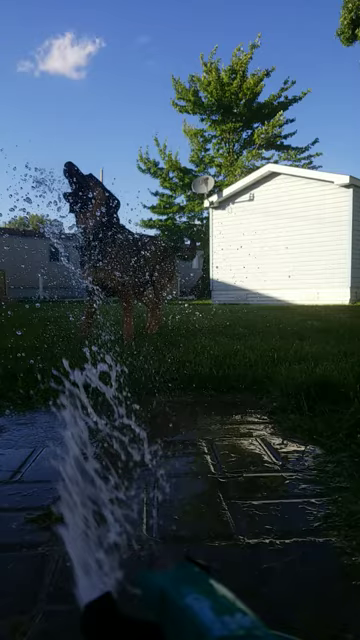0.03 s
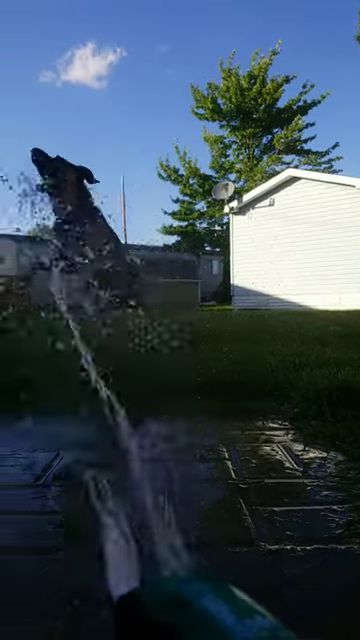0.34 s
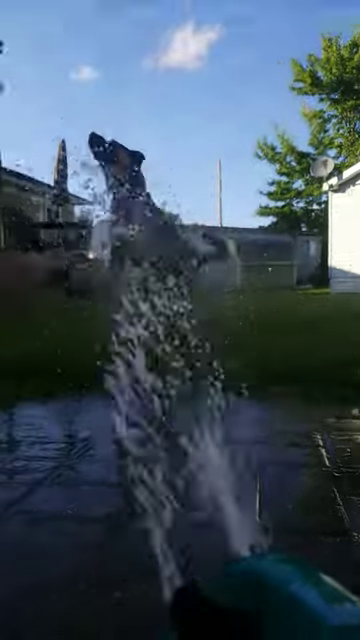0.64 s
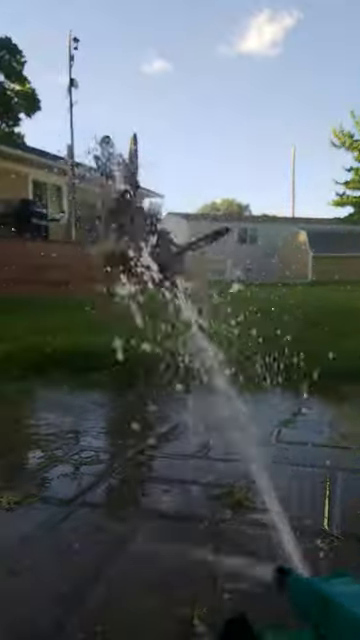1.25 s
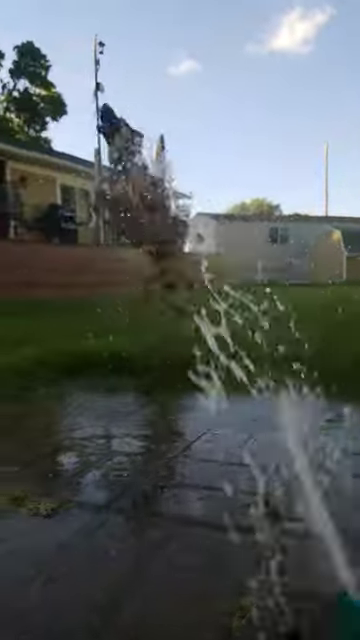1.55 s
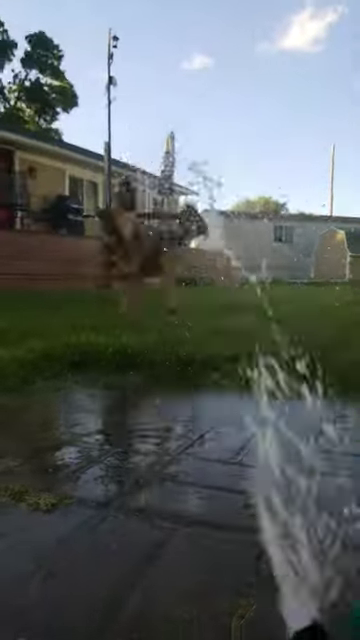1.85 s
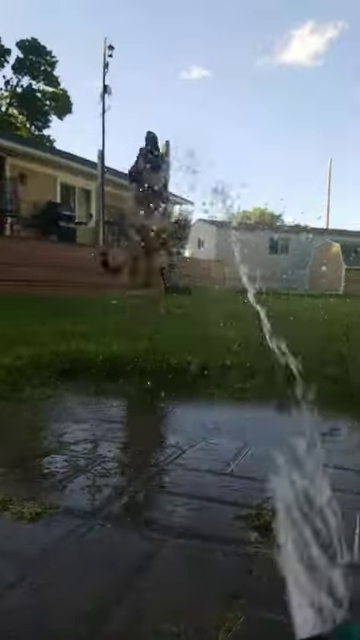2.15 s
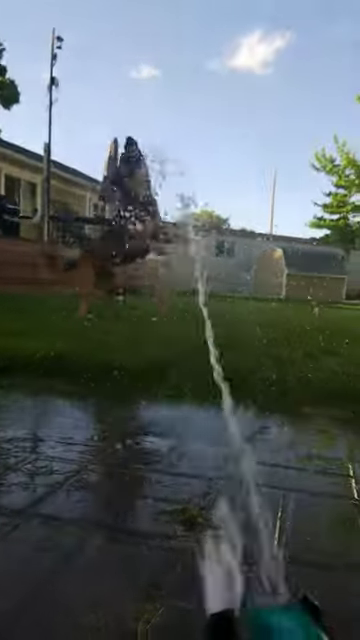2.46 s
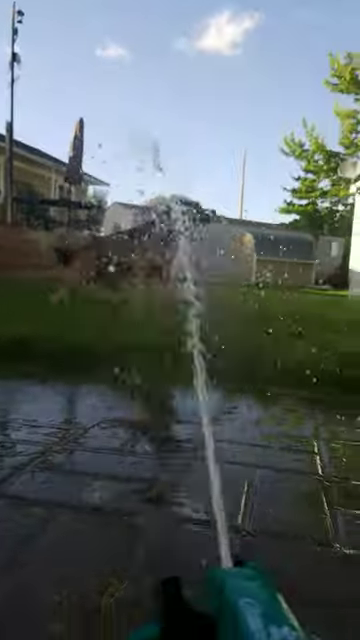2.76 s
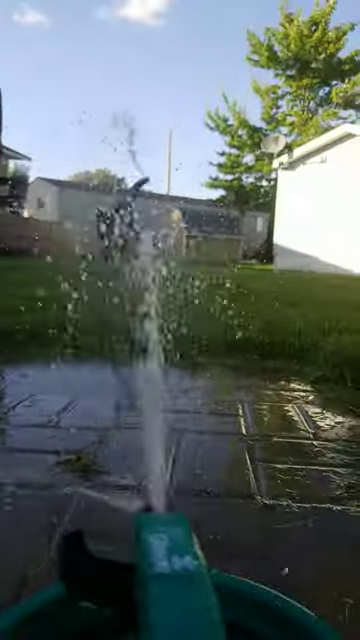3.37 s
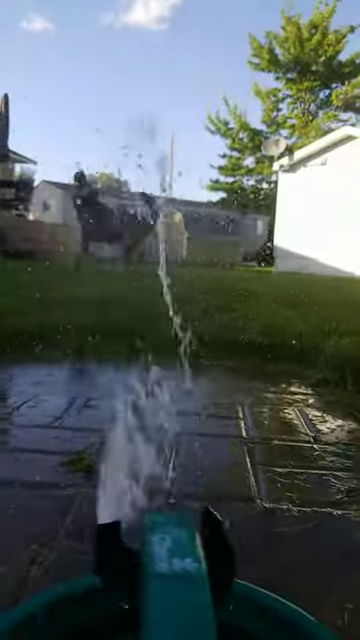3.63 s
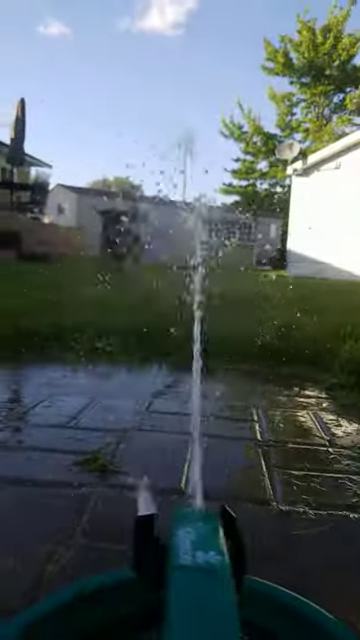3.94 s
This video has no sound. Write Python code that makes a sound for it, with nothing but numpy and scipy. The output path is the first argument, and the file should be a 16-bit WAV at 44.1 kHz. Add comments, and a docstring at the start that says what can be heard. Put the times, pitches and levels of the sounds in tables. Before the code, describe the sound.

An impact sprinkler right at the microphone fades in with quick clacking spurts, then settles into slightly slower, even slaps of hissing spray. A few metres off in the backyard, a dog splashes faintly now and then.

```python
"""A backyard, the microphone right at an impact sprinkler, a dog a few metres off.
After a moment of silence the sound fades in on a low rumble, a faint hum and the quick return sweep:
the sprung arm cuts the jet into bursts of spray and clacks on its stop. The dog starts to leap and splash.
From 1 s the head steps forward more slowly: each stroke slaps, sprays and rings the plastic base, and the
free jet fizzes in between. The water changes colour as the head turns away; the dog splashes on and off."""
import sys
import numpy as np
from scipy import signal
from scipy.fft import rfft, irfft
from scipy.io import wavfile

SR = 44100
rng = np.random.default_rng(int(sys.argv[2]) if len(sys.argv) > 2 else 0)


def master(y):
    """Save y as 16-bit WAV."""
    cut = np.clip(np.atleast_2d(y).T, -1, 1)
    pcm = np.round(cut * 32767)  # scale
    wavfile.write(sys.argv[1], SR, pcm.astype(np.int16))


N = 176400
TIME = np.arange(N) / SR

# quick strokes of the return sweep: t/s, time in the jet/s, relative spray level/dB
RETURN_STROKES = [(0.2514, 0.03, -24), (0.3232, 0.032, -23.5), (0.3974, 0.032, -23.5),
                  (0.4689, 0.0324, -23.5), (0.5409, 0.032, -24), (0.6136, 0.032, -24.5),
                  (0.6869, 0.034, -24.5), (0.7607, 0.034, -24), (0.8368, 0.035, -23), (0.91, 0.03, -22)]
# forward strokes: t/s, time in the jet/s, relative levels of spray/dB, slap/dB and free jet/dB
FORWARD_STROKES = [(1.0203, 0.024, -21.5, -42.5, -30), (1.122, 0.026, -21.7, -38.5, -30.5),
                   (1.2269, 0.024, -20.5, -37.5, -29.5), (1.3314, 0.0278, -21.4, -39.5, -30.2),
                   (1.434, 0.026, -21, -38.5, -29.5), (1.5386, 0.025, -20.5, -38, -30.7),
                   (1.6407, 0.024, -19.5, -38.5, -32), (1.7475, 0.024, -20.5, -41, -30.5),
                   (1.851, 0.023, -20, -40.5, -33.5), (1.9533, 0.024, -22.5, -42, -32),
                   (2.058, 0.023, -22, -40.5, -33.7), (2.1602, 0.0249, -24, -41.5, -32.5),
                   (2.2673, 0.023, -24.5, -39.5, -33), (2.3744, 0.023, -24.5, -40.5, -32),
                   (2.4774, 0.024, -25.5, -39, -33), (2.5881, 0.023, -24, -38.5, -33.5),
                   (2.6923, 0.024, -24.9, -40, -32), (2.7962, 0.0239, -25.5, -38, -30),
                   (2.8998, 0.022, -24.5, -38.5, -33), (3.0068, 0.022, -24.5, -37, -30.5),
                   (3.11, 0.023, -24, -38, -30), (3.2188, 0.022, -23.5, -37.5, -30.5),
                   (3.3233, 0.021, -22.5, -39.5, -29.5), (3.428, 0.024, -25, -36.5, -28),
                   (3.5374, 0.024, -24, -37, -29.5), (3.6437, 0.022, -23.0, -37.5, -29),
                   (3.747, 0.024, -24, -39, -31), (3.8539, 0.023, -25.5, -38, -34.5),
                   (3.9624, 0.028, -24.5, -37.5, -32)]


def amp(db):
    """Decibels to gain."""
    return 10 ** (np.asarray(db) / 20)


def unit(x):
    """Scales to rms 1."""
    return x / np.sqrt(np.mean(x ** 2) + 1e-20)


def ramp(t, length):
    """Rises from 0 to 1 over the length."""
    return np.clip(t / length, 0, 1)


def wander(rate_hz):
    """Random drift of rms 1, up to the given rate."""
    hz = np.fft.rfftfreq(N, 1 / SR)
    return unit(irfft(rfft(rng.standard_normal(N)) / (1 + (hz / rate_hz) ** 4), N))


def colour(x, spectrum):
    """Minimum-phase filter through points of f/Hz, relative level/dB; white noise keeps its level."""
    point_hz, point_db = np.transpose(spectrum)
    hz = np.fft.rfftfreq(4096, 1 / SR)
    db = np.interp(np.log(hz + 1), np.log(point_hz + 1), point_db)
    gain = unit(amp(np.maximum(db, -90)))
    phase = -signal.hilbert(np.log(np.r_[gain, gain[-2:0:-1]])).imag[:len(hz)]
    impulse = irfft(gain * np.exp(1j * phase))[:len(hz)]
    return signal.oaconvolve(x, impulse)[:N]


def droplets(clump_db, clump_hz):
    """Noise of water breaking up: its strength jumps from clump to clump."""
    return unit(rng.standard_normal(N) * amp(clump_db * np.clip(wander(clump_hz), -2.5, 2.5)))


def turning(source, spectra):
    """Crossfades at equal power between spectra, keyed by heading, as the head turns."""
    # the head's path: t/s, heading (0 start, 1 side on to the microphone, 2 facing away, 3 just past that)
    path = [(.5, 0.5), (.85, 0.2), (1.3, 1.12), (1.7, 1), (2.05, 1.62), (2.45, 2.06), (3, 2), (3.55, 3.5),
            (4, 3)]
    heading = np.interp(TIME, *np.transpose(path))
    out = np.zeros(N)
    for selector, spectrum in zip(np.eye(len(spectra)), spectra.values()):
        share = np.interp(heading, list(spectra), selector)
        out += colour(source() * np.sqrt(share), spectrum)
    return out


def yard():
    """The bed of the place: low rumble, the patter of water on paving and a distant hum."""
    # tones of the hum: f/Hz, rms level/dB
    hum_tones = [(116.3, -61), (139.2, -65)]
    # outdoor rumble and falling water: f/Hz, relative level/dB
    bed_spectrum = [(20, -27), (45, -5), (65, -4.5), (95, 4), (140, 1), (220, -1), (400, -6.5), (800, -8),
                    (1500, -14), (2200, -11), (4000, -27), (7000, -19), (9000, -18), (15700, -11)]
    hum = np.zeros(N)
    for hz, db in hum_tones:
        phase = 2 * np.pi * hz * TIME + 0.5 * wander(rate_hz=3.3)
        hum += amp(db) * np.sqrt(2) * np.sin(phase)
    return amp(-46.5) * colour(droplets(clump_db=0.5, clump_hz=596), bed_spectrum) + hum


def echo(x, level_db=-27.5, t60_s=0.087):
    """Weak scatter reaches the microphone from the paving and the walls around."""
    t = TIME[:SR // 2]
    tail = rng.standard_normal(len(t)) * amp(-60 * t / t60_s)
    return amp(level_db) * signal.oaconvolve(x, tail / np.linalg.norm(tail))[:N]


def dog(rise_s=0.0015, relative_bandwidth=0.73):
    """Dull plops and sloshes a few metres off, as the dog meets the water."""
    # splashes: t/s, decay/s, level/dB, f/Hz
    splashes = [(0.429, 0.019, -38, 367), (0.455, 0.0074, -40, 398), (0.489, 0.02, -36.5, 330),
                (1.072, 0.024, -41, 300), (1.087, 0.021, -39, 450), (1.105, 0.0078, -36, 328),
                (1.109, 0.0038, -30.5, 770), (1.11, 0.0035, -34, 1800), (1.123, 0.018, -37, 400),
                (1.145, 0.014, -35, 353), (1.155, 0.011, -39.5, 356), (1.377, 0.011, -41, 418),
                (1.791, 0.076, -44.5, 384), (2.724, 0.0037, -34, 567), (2.755, 0.063, -47.5, 550),
                (3.375, 0.13, -47.5, 447), (3.442, 0.036, -41.5, 770)]
    out = np.zeros(N)
    for start, decay, db, hz in splashes:
        t = TIME - start
        band = signal.iirpeak(hz, 1 / relative_bandwidth, SR)
        slosh = unit(signal.lfilter(*band, rng.standard_normal(N)))
        out += amp(db) * slosh * ramp(t, rise_s) * np.exp(-np.maximum(t - rise_s, 0) / decay)
    return out


def base(gain_db=10, delay_s=0.00179, rise_s=0.0031):
    """On each forward stroke the blow of the arm rings the hollow plastic base."""
    # modes of the base: f/Hz, relative level/dB, t60/s
    modes = [(535.5, -16.5, 0.079), (827, -8, 0.052), (983, -0.5, 0.027), (1114, 1, 0.044),
             (1163, -5, 0.03), (1797, -7, 0.028), (2190, -7, .03)]
    out = np.zeros(N)
    for start, _, _, slap_db, _ in FORWARD_STROKES:
        first = round((start + delay_s) * SR)
        t = TIME[:N - first][:SR // 8]
        ring = sum(amp(db - 60 * t / t60) * np.sin(2 * np.pi * hz * t) for hz, db, t60 in modes)
        out[first:first + len(t)] += amp(slap_db + gain_db) * ramp(t, rise_s) * ring
    return out


def arm_clacks(decay_s=0.0035):
    """On the return sweep the arm hits its stop and rebounds."""
    # hit and rebound: delay after the stroke/s, level/dB
    hits = [(0.0433, -29), (0.0519, -32)]
    # the arm on its stop: f/Hz, relative level/dB
    spectrum = [(300, -13.5), (900, -5), (1300, 1), (1900, -5.5), (2300, -4), (2900, -5), (3700, -0.5),
                (4600, -6), (8000, -15), (15000, -28)]
    level = np.zeros(N)
    for start, *_ in RETURN_STROKES:
        for delay, db in hits:
            t = TIME - start - delay
            level += amp(db) * (t > 0) * np.exp(-abs(t) / decay_s)
    return colour(level * droplets(clump_db=0.5, clump_hz=1000), spectrum)


def arm_thuds(level_db=-48.5, delay_s=0.0094, width_s=0.0058):
    """Each forward stroke thuds into the base."""
    # the dull blow: f/Hz, relative level/dB
    spectrum = [(100, -40), (350, 3), (550, 4.5), (850, 0.5), (1300, -32), (4000, -76)]
    pulses = sum(np.exp(-((TIME - start - delay_s) / width_s) ** 2) for start, *_ in FORWARD_STROKES)
    return colour(amp(level_db) * pulses * droplets(clump_db=0.5, clump_hz=1000), spectrum)


def arm_slaps(gain_db=15, delay_s=0.00073, rise_s=0.0038, decay_s=0.005, tail_db=-26, tail_s=0.022):
    """Water slaps the arm on each forward stroke: a sharp burst with a faint tail."""
    # water on the arm: f/Hz, relative level/dB
    spectrum = [(200, -30.5), (520, -13), (680, -18.5), (830, -15.5), (1110, -16.5), (1310, -16),
                (1450, -8), (1950, -21.5), (2200, -5.5), (2450, -13), (3000, -3), (3600, -6), (4500, 3),
                (7000, -12.5), (9000, -23), (15000, -14.5)]
    level = np.zeros(N)
    for start, _, _, slap_db, _ in FORWARD_STROKES:
        t = TIME - start - delay_s
        after_peak = np.maximum(t - rise_s, 0)
        decay = np.exp(-after_peak / decay_s) + amp(tail_db) * np.exp(-after_peak / tail_s)
        level += amp(slap_db + gain_db) * ramp(t, rise_s) * decay
    return colour(level * droplets(clump_db=0.5, clump_hz=1000), spectrum)


def jet():
    """The free jet spits and fizzes from when the arm swings clear until it comes back."""
    # the jet with the head side on, facing away and just past that: f/Hz, relative level/dB
    side = [(300, -23.5), (900, -19.5), (1700, -20), (2300, -13.5), (2700, -16.5), (3400, -12),
            (3800, -11.5), (4100, -12), (4500, -13), (5000, -10.5), (6400, -10.5), (7050, -4),
            (7800, -12.5), (8800, -15), (10000, -5.5), (11300, -7.5), (12300, 2), (13000, -5), (14100, 0.5),
            (15700, -7.5)]
    away = [(300, -29), (950, -20), (1400, -15), (1950, -16), (2200, -5.5), (2650, -18), (3500, -8.5),
            (3780, -5), (4050, -7), (4550, -2), (4900, -10), (7000, -4), (8200, -12.5), (10600, -7),
            (11600, -10.5), (12200, 7.5), (12900, -3.5), (14000, 3.5), (15700, -3)]
    past = [(300, -25), (950, -18), (1400, -18), (1950, -22), (2200, -7), (2650, -17), (3500, -11),
            (3780, -8), (4050, -16), (4550, -5), (4900, -13), (7000, -7.5), (8300, -12), (9800, -22),
            (10700, -12), (11600, 0), (12300, 3), (12900, -6), (14200, 4), (15700, -1.5)]
    clear_s, cut_s = 0.039, 0.021  # free from this long after a stroke to this long before the next
    edge_s, sag_db_per_s = 0.0045, 87
    graze_db, graze_s = -43, 0.0019  # the arm's edge first grazes the jet
    leak_db, return_db = -43, -49.5  # a steady fizz, and a little more during the return sweep
    starts = [start for start, *_ in FORWARD_STROKES]
    jet_dbs = [db for *_, db in FORWARD_STROKES]
    # the first gap opens after the last return stroke
    gaps = zip([RETURN_STROKES[-1][0]] + starts, starts + [2 * starts[-1] - starts[-2]])
    level = amp(leak_db) + amp(return_db) * (TIME < starts[0])
    for (start, following), db in zip(gaps, jet_dbs[:1] + jet_dbs):
        t = TIME - start - clear_s
        free = ramp(t + edge_s, edge_s) * ramp(following - cut_s - TIME, edge_s)
        level += free * amp(db - sag_db_per_s * np.maximum(t, 0))
        level += amp(graze_db) * np.exp(-abs(TIME - following) / graze_s)
    return turning(lambda: level * droplets(clump_db=3.5, clump_hz=704), {1: side, 2: away, 3: past})


def spray(gain_db=3.5):
    """While the arm sits in the jet it shatters the water into a loud fan, right at the microphone."""
    # the fan at the start, side on, facing away and just past that: f/Hz, relative level/dB
    initial = [(240, -53), (400, -21), (715, -22), (833, -14.5), (985, -23), (1130, -10), (1340, -27),
               (1560, -18), (1810, -19.5), (2350, -12), (2870, -8.5), (3340, -10.5), (3550, -14.5),
               (4080, -1), (4470, -1), (4900, -6), (5880, 3.5), (6650, -16), (7070, -14), (7860, -4),
               (8890, -11.5), (12400, -4.5), (15400, -10)]
    side = [(710, -49), (1200, -28.5), (1350, -21), (1750, -20.5), (1990, -21.5), (2190, -15.5),
            (3520, -19.5), (4090, -6.5), (4360, -2), (5590, -2), (6220, -7.5), (6640, -4.5), (7160, 2),
            (7470, -1.5), (8320, -13), (8970, -18), (9670, -10), (10900, -18), (11900, -5.5),
            (12900, -15.5), (15700, -6)]
    away = [(410, -32.5), (700, -22), (1090, -18), (1370, -27.5), (1890, -18), (2890, -9), (3610, -12),
            (4320, 0), (4790, -2.5), (6280, -3.5), (7620, -13), (9490, -15), (11700, -3.5), (15300, -9)]
    past = [(410, -50), (700, -30), (776, -15), (895, -28), (1070, -15), (1330, -29), (1710, -38),
            (2100, -16), (2270, -20), (3210, -9), (3750, -11.5), (4210, -5), (4490, 0.5), (4910, -7),
            (5450, 0), (5890, -6.5), (6440, 1.5), (7240, -13), (9130, -13), (9870, -18), (11500, -5),
            (12400, -9), (15300, -9)]
    rise_db_per_s, sag_db = 1900, 1.5
    seat_db, seat_s = 4.5, 0.006  # the fan gains its last strength as the arm seats

    def bursts(strokes, fall_db_per_s, entry_db, entry_s=0.0076):
        """Envelope of one sweep; a negative entry_db lets the arm enter the jet more gently."""
        envelope = np.zeros(N)
        for start, length, db, *_ in strokes:
            t = TIME - start
            attack_db = rise_db_per_s * np.minimum(t, 0) - seat_db * ramp(-t, seat_s)
            easing_db = entry_db * (t > 0) * (1 - ramp(t, entry_s))
            fall_db = sag_db * ramp(t, length) + fall_db_per_s * np.maximum(t - length, 0)
            envelope += amp(db + gain_db + attack_db + easing_db - fall_db)
        return envelope

    level = bursts(RETURN_STROKES, fall_db_per_s=1800, entry_db=-2)
    level += bursts(FORWARD_STROKES, fall_db_per_s=1904, entry_db=0)
    spectra = {0: initial, 1: side, 2: away, 3: past}
    return turning(lambda: level * droplets(clump_db=2, clump_hz=900), spectra)


def scene():
    """Sprinkler and dog in the yard, on one microphone."""
    direct = spray() + jet() + arm_slaps() + arm_thuds() + arm_clacks() + base() + dog()
    return (direct + echo(direct) + yard())[None]


def record(dry, silence_s=0.244, fade_from_s=0.23, fade_s=0.41, cutoff_hz=15780):
    """The sound fades in after a moment of silence; a steep low-pass takes off the very top."""
    faded = dry * (TIME > silence_s) * ramp(TIME - fade_from_s, fade_s)
    low_pass = signal.firwin(801, cutoff_hz, window=("kaiser", 8), fs=SR)
    return signal.oaconvolve(faded, low_pass[None], "same")


dry = scene()
out = record(dry)
master(out)
```